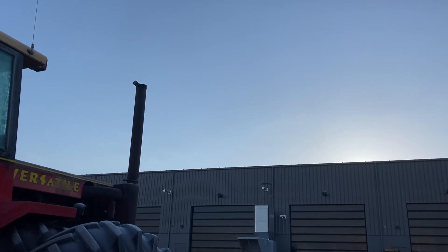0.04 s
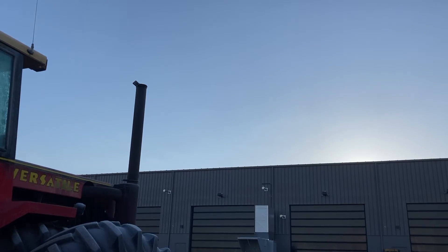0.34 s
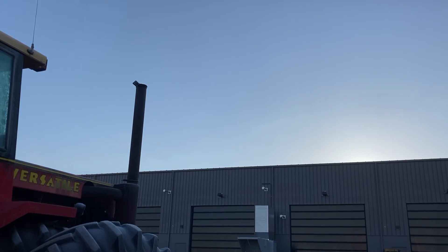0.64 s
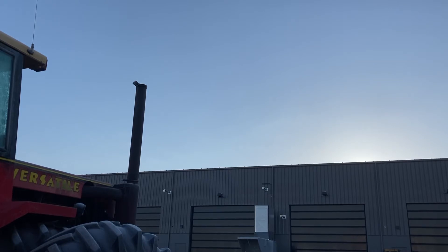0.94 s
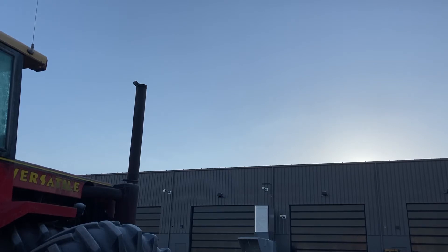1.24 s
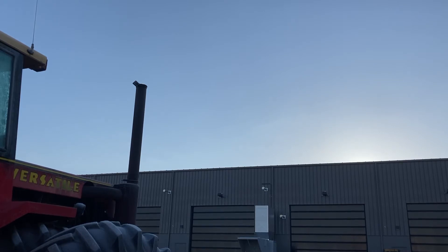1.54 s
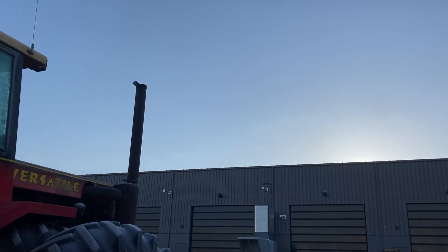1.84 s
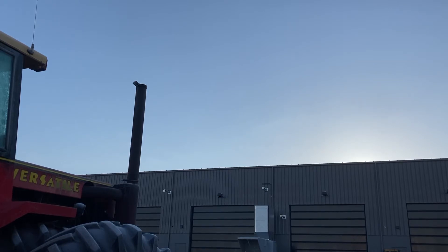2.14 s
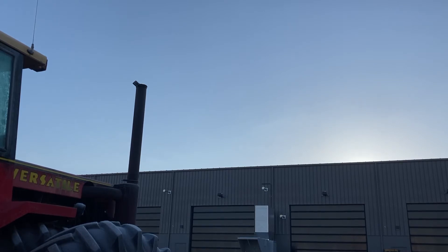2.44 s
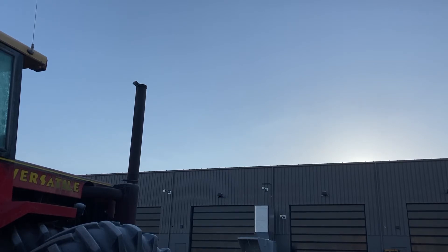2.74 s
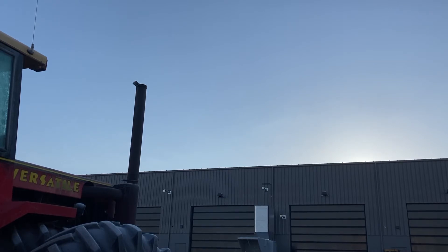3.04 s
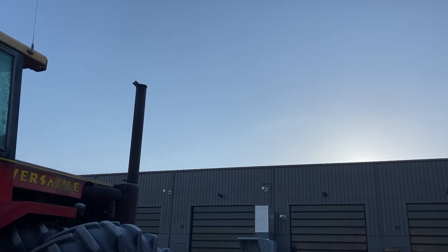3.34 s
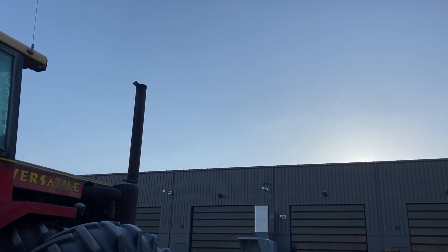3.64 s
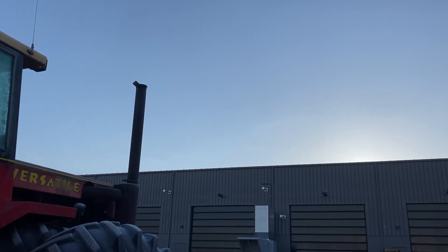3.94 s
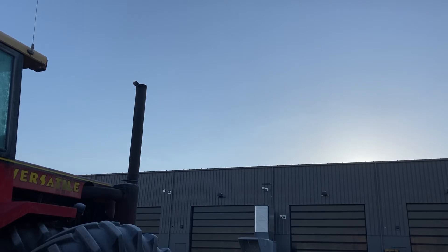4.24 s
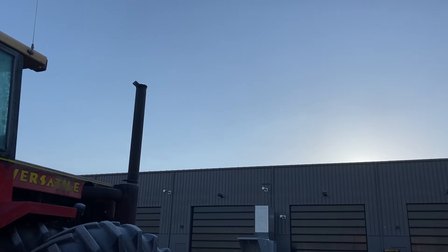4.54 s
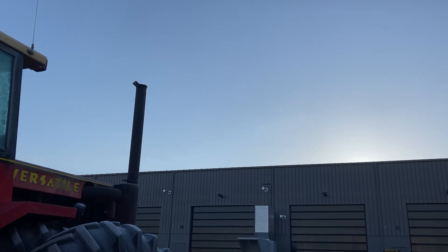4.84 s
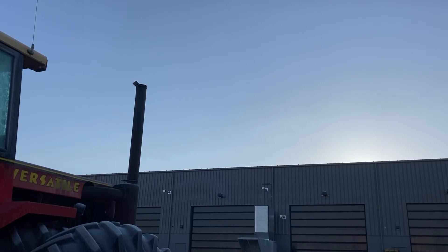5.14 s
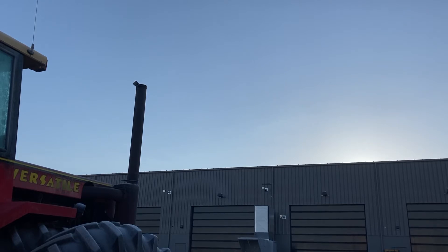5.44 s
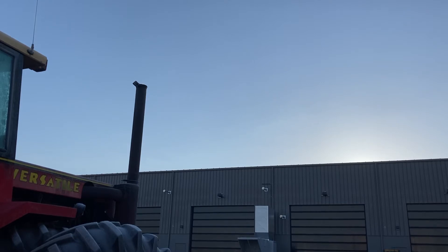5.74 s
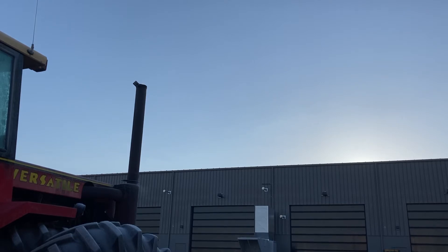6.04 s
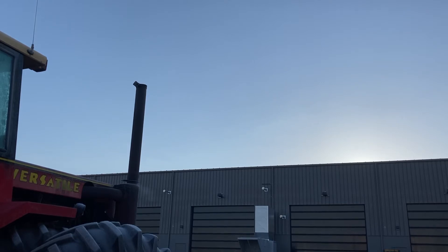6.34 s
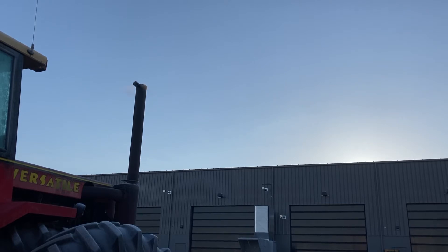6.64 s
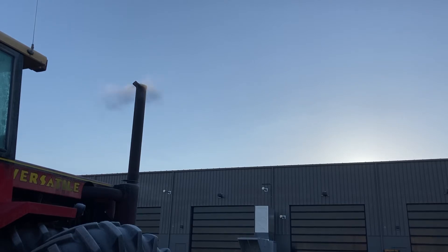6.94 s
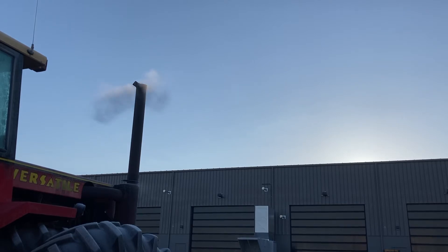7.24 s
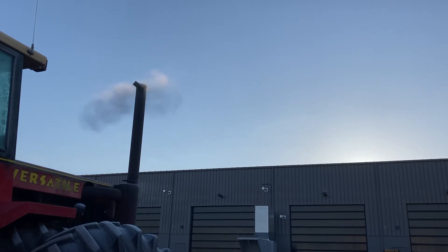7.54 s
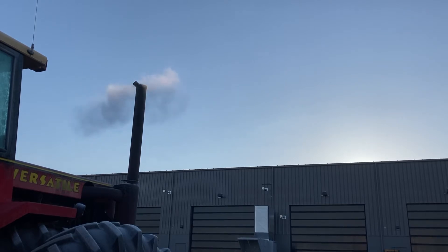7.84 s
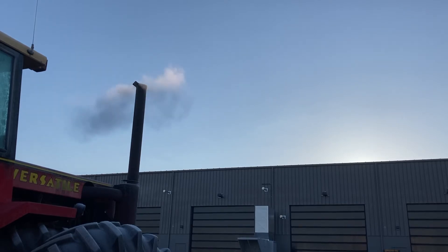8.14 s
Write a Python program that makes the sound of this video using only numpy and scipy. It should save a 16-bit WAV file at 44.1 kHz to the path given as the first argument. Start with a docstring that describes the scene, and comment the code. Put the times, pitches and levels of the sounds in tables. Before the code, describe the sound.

A diesel engine idles outdoors from the start and runs throughout, with even low knocking, light ticking and a hum carrying a gently wavering whine. A faint click comes at about 4.2 seconds. At about 5.6 seconds, a tractor close by gives a quick pair of sharp metal clacks, and its starter engages with one heavy thud at 5.7. Cranking follows, clearly louder than the idle. The starter's rough, low groan lurches at first, then rises a little in pitch and settles by about 6.5 seconds into nine or ten pulses a second. The cold engine thumps, clatters, rings and puffs air as it turns, with scattered metal clacks between 6 and 8 seconds. A nearby metal building throws back a short echo. The tractor is still cranking without catching when the sound ends at about 8.4 seconds.

```python
"""Tractor cranking in a yard

A diesel engine idles by a metal building, knocking, ticking and humming. Then a big tractor is cranked
close by. The starter pinion slams in and its gear groans up to speed, swelling at every compression,
while the cold engine thumps, clatters, puffs and now and then clacks. The wall throws the groan back."""
import sys
import numpy as np
from scipy import signal
from scipy.fft import rfft, irfft, next_fast_len
from scipy.io import wavfile
from scipy.ndimage import uniform_filter1d, map_coordinates

SR = 44100
rng = np.random.default_rng(int(sys.argv[2]) if len(sys.argv) > 2 else 0)


def file_out(sig):
    """Save sig as 16-bit WAV at sys.argv[1]."""
    # one column per channel
    cols = np.atleast_2d(sig).T
    # limit, then scale
    lim = np.clip(cols, -1, 1)
    pcm = np.round(lim * 32767).astype(np.int16)
    wavfile.write(sys.argv[1], SR, pcm)


N = 369999
T = np.arange(N) / SR
HZ = np.fft.rfftfreq(N, 1 / SR)

IDLE_REV_HZ = 11.667
START_S, LANDING_S = 5.68, 5.693  # starter takes load; pinion lands
IDLE_DELAY_S, CRANK_DELAY_S = 0.00046, 0.000258  # right channel behind left

# Stereo image of each engine: (frequency [Hz], coherence [0-1], extra left lead [rad], left-right [dB])
IDLE_IMAGE = [(60, 0.98, 0, -2.3), (140, 0.85, 0.1, -4.7), (290, 0.6, -0.3, -2), (560, 0.55, 2.2, -4.5),
              (720, 0.65, 0.6, 2), (1300, 0.65, -1.2, 0.5), (2700, 0.7, -0.9, 0), (3300, 0.4, 1.4, 2),
              (5000, 0.25, 1.8, -2.3), (7000, 0.3, -0.6, -2), (12000, 0.3, 0, 0)]
CRANK_IMAGE = [(60, .99, 0, -3.5), (220, .96, 0, -.7), (300, .9, .6, .9), (600, .25, .8, 2.4),
               (1050, .5, .35, 2.2), (1500, .55, .6, 2.2), (4500, .15, 0, 0), (10000, .7, 0, 0)]
# Starter speed, lurching, then steady: (time [s], tooth mesh rate [Hz])
MESH_RATE = [(5.68, 232), (5.785, 242), (5.835, 200), (5.9, 247), (5.955, 196), (6.0, 228), (6.07, 281),
             (6.1, 279), (6.135, 232), (6.165, 257), (6.19, 234), (6.225, 270), (6.29, 256), (6.45, 288),
             (8.39, 293.5)]
# Each cylinder in turn loads the starter: (time [s], groan [dB], low ring [dB], high ring [dB], boom [dB])
COMPRESSIONS = [(5.69, -23.5, -40, -46, -31), (5.905, -14.5, -32, -45, -26), (6.115, -15, -42, -43, -27.5),
                (6.262, -15.5, -34, -28.5, -26), (6.367, -20, -30, -33, -25),
                (6.487, -16.5, -23.5, -31, -29), (6.599, -17.5, -28, -31, -27),
                (6.703, -22, -25, -39, -32.5), (6.792, -22, -23, -26.5, -32.5), (6.897, -17, -28, -33, -25),
                (7.011, -18.5, -26, -30, -27), (7.117, -19, -28.5, -32, -32),
                (7.221, -20.5, -23, -26.5, -24.5), (7.32, -19, -24, -29, -28), (7.419, -20, -30, -25, -35),
                (7.53, -17.5, -26, -36, -21.5), (7.643, -16.5, -32.5, -36, -31),
                (7.751, -19.5, -29.5, -29.5, -33), (7.854, -16.5, -30, -29, -32),
                (7.961, -18, -34.5, -31, -29), (8.064, -18.5, -41, -37, -29),
                (8.171, -20.5, -38.5, -27, -23.5), (8.271, -18, -32, -30.5, -25.5),
                (8.375, -19, -31, -30, -25), (8.48, -17.5, -31, -30, -22)]


def amp(db):
    """Decibels to gain."""
    return 10 ** (np.asarray(db) / 20)


def unit(x):
    """Scale to rms 1."""
    return x / np.sqrt(np.mean(x ** 2) + 1e-20)


def curve(rows):
    """Time table's first value column at every sample."""
    rows = np.array(rows)
    return np.interp(T, rows[:, 0], rows[:, 1])


def across(rows, hz=HZ, column=1):
    """Frequency table column, interpolated on a log axis."""
    rows = np.array(rows)
    return np.interp(np.log(hz + 1), np.log(rows[:, 0] + 1), rows[:, column])


def bump(centre_s, half_s):
    """Gaussian envelope, peak 1."""
    return np.exp(-((T - centre_s) / half_s) ** 2)


def drift(hz):
    """Low-passed noise, rms 1."""
    size = next_fast_len(N)
    lowpass = 1 / (1 + (np.fft.rfftfreq(size, 1 / SR) / hz) ** 4)
    return unit(irfft(rfft(rng.standard_normal(size)) * lowpass, size)[:N])


def colour(x, spectrum, modes=(), ripple_db=0):
    """Filter by a broad spectrum, resonance humps and the ripple of many small panel modes."""
    humps_db = sum(db / (1 + (2 * (HZ - hz) / width) ** 2) for hz, width, db in modes)
    panels = unit(uniform_filter1d(uniform_filter1d(rng.standard_normal(len(HZ)), size=250), size=150))
    return irfft(rfft(x) * amp(across(spectrum) + humps_db + ripple_db * panels * HZ / (HZ + 1000)), N)


def stereo(pair, image=CRANK_IMAGE, delay_s=CRANK_DELAY_S):
    """Mix two independent signals into partly coherent left and right."""
    a, b = rfft(pair)
    coherence = np.clip(across(image), 0, 1)
    tilt = amp(across(image, column=3))
    lead_rad = 2 * np.pi * HZ * delay_s + across(image, column=2)
    right = (coherence * a + np.sqrt(1 - coherence ** 2) * b) * np.exp(-1j * lead_rad)
    return irfft(np.array([a * tilt, right]) * np.sqrt(2 / (1 + tilt ** 2)), N)


def point(x, image=CRANK_IMAGE, delay_s=CRANK_DELAY_S):
    """Point source: fully coherent, placed by phase and level."""
    return stereo(np.array([x, x]), [(hz, 1, lead, db) for hz, _, lead, db in image], delay_s)


def yard(x, wet_db, gap_s=0.02):
    """Add scattered wall and ground echoes, separate per channel."""
    # Echo decay: (frequency [Hz], t60 [s])
    decay = [(100, 1), (1000, 0.32), (8000, 0.24)]
    size = SR // 2
    taps = rng.standard_normal((2, size)) * (rng.random((2, size)) < .05) * (T[:size] > gap_s)
    hz, t, bins = signal.stft(taps, SR, nperseg=256)
    tail = signal.istft(bins * amp(-60 * t / across(decay, hz)[:, None]), SR, nperseg=256)[1]
    return x + amp(wet_db) * signal.fftconvolve(x, tail / np.linalg.norm(tail[0]), axes=1)[:, :N]


def rev_noise(revs):
    """Noise that partly repeats every revolution."""
    # Repeating part: (frequency [Hz], power share [0-1])
    repeating = [(70, .3), (300, .35), (600, .5), (1000, .6), (1400, .65), (2400, .6), (3800, .3),
                 (7000, .7)]
    size = round(SR / IDLE_REV_HZ)
    one_rev = unit(irfft(np.exp(2j * np.pi * rng.random((2, size // 2 + 1))), size))
    looped = np.array([map_coordinates(side, [revs % 1 * size], mode="grid-wrap") for side in one_rev])
    fresh = rng.standard_normal((2, N))
    share = np.clip(across(repeating), 0, 1)
    return irfft(rfft(looped) * np.sqrt(share) + rfft(fresh) * np.sqrt(1 - share), N)


def idle_knocks(revs, valve_db=0.35, firing_db=0.65):
    """Three firings per revolution, with valve beats between, shake the block."""
    # Knocking: (frequency [Hz], density [dB/Hz])
    spectrum = [(20, -111), (45, -61.5), (72, -59.5), (125, -64), (200, -67.5), (255, -64), (335, -71.5),
                (375, -67), (450, -72), (650, -66.5), (1000, -70), (1600, -71), (2400, -77), (4200, -81.5),
                (7000, -105), (11500, -104), (15000, -120)]
    # Block and cover resonances: (frequency [Hz], width [Hz], gain [dB])
    modes = [(75, 11, 0.5), (578, 46, 5), (1226, 170, 2), (2210, 290, 6), (3080, 75, 5), (3540, 400, 3.5),
             (5344, 710, 13.5), (6884, 1170, 20)]
    firing_rad = 2 * np.pi * 3 * revs
    beats = amp(valve_db * np.cos(2 * firing_rad) + firing_db * np.cos(firing_rad))
    return colour(unit(rev_noise(revs) * beats), spectrum, modes, ripple_db=3.5) * np.sqrt(SR / 2)


def idle_ticks(revs, decay_s=0.0096):
    """Injectors and valves ring the covers in the same pattern every turn."""
    # Ticks: (place in revolution [0-1], level [dB])
    pattern = [(0, 0), (.167, -9), (.333, -4), (.5, -5), (.667, -4), (.833, -10)]
    # Cover response: (frequency [Hz], density [dB/Hz])
    covers = [(900, -110), (1700, -88), (2100, -80.5), (2400, -81), (2850, -79.5), (3300, -93),
              (6000, -118), (12000, -140)]
    beats = sum(amp(db) * np.exp(-((revs - place) % 1) / IDLE_REV_HZ / decay_s) for place, db in pattern)
    return colour(unit(rev_noise(revs) * beats), covers) * np.sqrt(SR / 2)


def idle_hum(revs, waver_db=0.8, whine_db=1.3, trough_db=-12):
    """Tones at multiples of crank speed; the whine dips, the tones just above it surge."""
    # Engine orders: (crank multiple, left [dB], right [dB], left lead [rad])
    orders = [(5, -49.5, -48.0, -0.2), (6, -48.0, -45.0, -0.0), (8, -51.0, -46.5, 0.2),
              (12, -39.5, -34.5, 0.7), (13, -47.0, -47.0, 0.4), (15, -47, -40.5, 0.3), (18, -53, -57, 0.7),
              (23, -58.5, -49.0, 0.7), (36, -58.5, -51.0, 3.0), (42, -49.0, -50.0, 2.8),
              (46, -42.5, -40.5, 1.9), (48, -41.0, -33.0, -2.6), (50, -48.0, -54.5, 2.9),
              (54, -59.0, -50.5, 2.4), (56, -53, -54, 1.5), (57, -53, -53, 1.5), (59, -46.0, -51.0, 1.7),
              (60, -51.5, -48.5, 2.5), (63, -47.0, -48.0, -2.8), (64, -51.5, -52.5, -3.0),
              (68, -53, -55, 2), (69, -52.0, -55.0, -2.9), (71, -50.0, -56.5, -1.8), (72, -45, -56, 1.8),
              (81, -51.0, -54.0, 2.8), (84, -56, -57, 2), (93, -55.0, -48.0, -3.1),
              (94, -53.0, -52.0, -2.6), (95, -53.0, -53.5, -2.6), (102, -51.0, -48.5, 2.7),
              (105, -46.5, -58.0, 3.1), (107, -52, -53, 2.2), (108, -48.0, -48.5, 2.4),
              (110, -51.5, -56.0, 2.6), (116, -52.0, -50.5, 1.5), (118, -51.5, -51.5, 2.6),
              (120, -53, -53, 2.2), (192, -57.5, -53.0, -0.7), (198, -56, -56, 0.0), (216, -58, -58, 0.6),
              (219, -58, -58, 0.6), (240, -54.5, -53.0, 1.2)]
    # Dips of the whine near 550 Hz: (time [s], depth [dB])
    dips = [(.02, 1.5), (.52, 3), (1.25, 2.5), (1.6, 2), (1.97, 4.5), (2.4, 3), (2.9, 1), (3.35, 4),
            (3.97, 1), (4.25, 0), (4.6, -0.5), (4.95, 3), (5.58, 5.5)]
    # Surges at 650-700 Hz: (time [s], gain [dB], half length [s])
    surges = [(.36, 3, .17), (.9, 2, 0.18), (1.38, -2, .1), (1.78, -2, 0.1), (2.2, 1, .15),
              (2.638, 0, 0.12), (3.08, 2.5, 0.099), (3.58, -4, .14), (4.45, -4, .16), (5.0, -2, .13),
              (5.37, 3.5, 0.12)]
    whine = amp(whine_db - sum(db * bump(s, half_s=.08) for s, db in dips))
    surge = amp(trough_db) + sum(amp(db) * bump(s, half_s) for s, db, half_s in surges)
    out = np.zeros((2, N))
    for order, left_db, right_db, lead_rad in orders:
        angle = 2 * np.pi * (order * revs + rng.random())
        tone = np.array([amp(left_db) * np.cos(angle), amp(right_db) * np.cos(angle - lead_rad)])
        gain = whine if 46 <= order <= 48 else surge if 56 <= order <= 60 else 1
        out += gain * amp(waver_db * drift(hz=2.9)) * tone
    return np.sqrt(2) * out


def idle_swells(waver=0.0119):
    """Wavering tones rise out of the idle and sink back."""
    # Tones: (frequency [Hz], top level [dB], centre [s], half length [s])
    swells = [(56.7, -44.5, 1.8, 3.3), (73.6, -40, 1.1, 0.83), (77.3, -41.5, 2.75, 0.94),
              (81.2, -45.5, 4.45, 1.2), (296.5, -46.5, 1.48, 1.08), (371.6, -48, 1.3, 1.18)]
    out = np.zeros(N)
    for hz, db, s, half_s in swells:
        cycles = np.cumsum(hz * (1 + waver * drift(hz=9))) / SR
        out += amp(db) * bump(s, half_s) * np.cos(2 * np.pi * cycles)
    return point(np.sqrt(2) * out, IDLE_IMAGE, IDLE_DELAY_S)


def idle(wander=0.00047):
    """Idling diesel; slight speed wander blurs the high tones and leaves the low ones sharp."""
    revs = np.cumsum(IDLE_REV_HZ * (1 + wander * drift(hz=4.2))) / SR
    noise = stereo(idle_knocks(revs) + idle_ticks(revs), IDLE_IMAGE, IDLE_DELAY_S)
    return noise + idle_hum(revs) + idle_swells()


def engaged(rise_s=0.0052):
    """0 until the starter takes load, then 1."""
    return np.clip((T - START_S) / rise_s, 0, 1)


def strokes(lag_strokes):
    """Running count of compressions, less a lag."""
    return np.interp(T, [row[0] for row in COMPRESSIONS], np.arange(len(COMPRESSIONS))) - lag_strokes


def slack(lag_strokes=0.):
    """0 at each compression, 1 midway between two, shifted by the lag."""
    return .5 - .5 * np.cos(2 * np.pi * strokes(lag_strokes))


def stroke_db(column, lag_strokes=0.):
    """One level column of the compressions, held through each stroke."""
    nearest = np.clip(np.round(strokes(lag_strokes)), 0, len(COMPRESSIONS) - 1).astype(int)
    return uniform_filter1d(np.array(COMPRESSIONS)[nearest, column], size=600)


def exhaust(gain_db=-5, dip_db=18):
    """Each cylinder puffs air and smoke through the stack, harder under load."""
    # Puff: (frequency [Hz], level [dB])
    spectrum = [(30, -50), (90, -30), (160, -12), (240, 10), (340, -9), (450, 1), (700, -3), (900, -26),
                (2500, -32), (8000, -50)]
    air = unit(colour(rng.standard_normal((2, N)), spectrum))
    level_db = curve(COMPRESSIONS) + gain_db - dip_db * slack(lag_strokes=0.23)
    return stereo(air * amp(level_db) * engaged())


def clatter(build_db=15, run_up_s=0.15, bass_hz=140, treble_hz=4500, jolt_db=5, jolt_s=0.013):
    """Gears and valve gear rattle the block, building with speed; the landing pinion jolts it once."""
    # Rattle: (frequency [Hz], density [dB/Hz])
    spectrum = [(20, -62), (55, -48), (100, -53.5), (160, -55), (300, -53.5), (600, -53.5), (850, -58),
                (1150, -62), (1700, -63), (2700, -66.5), (4800, -76.5), (7000, -76.5), (11000, -84),
                (15500, -102)]
    # Engine resonances: (frequency [Hz], width [Hz], gain [dB])
    modes = [(90, 18, 3.5), (360, 30, -2), (1050, 150, 7), (1125, 50, 5.5), (1390, 70, 6), (1530, 50, 0.5),
             (1720, 60, 3), (1930, 150, 2), (2920, 220, 3), (6400, 730, 10)]
    blows = unit(rng.standard_normal((2, N)) * amp(1.5 * drift(hz=250)))
    rattle = colour(blows, spectrum, modes, ripple_db=3.0) * np.sqrt(SR / 2)
    treble = irfft(rfft(rattle) * HZ ** 4 / (HZ ** 4 + treble_hz ** 4), N)
    bass = irfft(rfft(rattle) / (1 + (HZ / bass_hz) ** 8), N)
    body = rattle - treble - bass
    sluggish = np.exp(-np.maximum(T - START_S, 0) / run_up_s)
    # After each compression the bass throbs, then the treble rises as the crank springs forward.
    throb = bass * (1 - sluggish) * amp(-4 - 8 * slack(lag_strokes=0.21))
    spring = treble * amp(-4 - 5 * slack(lag_strokes=0.38))
    turning = (body + throb + spring) * amp(-build_db * sluggish) * engaged()
    jolt = body * amp(jolt_db) * np.exp(-abs(T - LANDING_S) / jolt_s)
    return stereo(turning + jolt)


def clacks(gain_db=-1, t60_s=0.17, body_hz=4000):
    """Solenoid, pinion and loose metal strike with a short, dense ring."""
    # Strikes: (time [s], level [dB], body gain [dB])
    strikes = [(4.2482, -51, 0), (5.638, -37.5, 13.5), (5.67, -25.5, 6.5), (6.009, -32.5, -4),
               (6.4223, -36, -1), (6.4662, -35, 7), (6.893, -36.5, 10), (7.309, -32.5, 9), (7.634, -34, 10),
               (8.0521, -37, -1)]
    # Metal ring: (frequency [Hz], level [dB])
    spectrum = [(200, -8), (1000, -31), (3500, 9.5), (7000, 9), (11000, 9), (15500, -11)]
    ring = unit(colour(rng.standard_normal((2, N)), spectrum))
    body = irfft(rfft(ring) / (1 + (HZ / body_hz) ** 4), N)
    out = np.zeros((2, N))
    for s, db, body_db in strikes:
        span = slice(round(s * SR), min(N, round(s * SR) + SR // 2))
        envelope = amp(db + gain_db - 60 * (T[span] - s) / t60_s)
        out[:, span] += (ring[:, span] + body[:, span] * (amp(body_db) - 1)) * envelope
    return stereo(out)


def booms(detune=0.0238, uneven_db=1.6, load_share=0.58):
    """Each compression rocks the block and stack, which boom harder under load."""
    # Block and stack modes: (frequency [Hz], level [dB], time to peak [s])
    modes = [(86, -29, .022), (228, -26.5, .014), (424, -26.5, .019), (505, -31, .022), (630, -30, .028)]
    t, out = T[:SR // 5], np.zeros(N + SR)
    mean_db = np.mean([row[-1] for row in COMPRESSIONS])
    for s, *_, boom_db in COMPRESSIONS:
        for hz, db, peak_s in modes:
            pitch, force = rng.standard_normal(2)
            tone = np.sin(2 * np.pi * (hz * (1 + detune * pitch) * t + rng.random()))
            envelope = t / peak_s * np.exp(1 - t / peak_s)
            gain = amp(db + load_share * (boom_db - mean_db) + uneven_db * force)
            out[round(s * SR):][:len(t)] += tone * envelope * gain
    return yard(point(out[:N]), wet_db=-13.5)


def housing_rings(gain_db=-1, dip_db=13, smear_cycles=.1):
    """As the crank springs forward, the gearing sings in one housing resonance after another."""
    # Housing resonances: (frequency [Hz], place in stroke [0-1], gain [dB])
    low_rings = [(721, .42, -1), (875, .88, -9)]
    high_rings = [(1006, .63, -3.5), (1042, .53, -1), (1163, .86, -6)]
    out = np.zeros(N)
    for column, rings in ((2, low_rings), (3, high_rings)):
        for hz, place, db in rings:
            tone = np.sqrt(2) * np.cos(2 * np.pi * (hz * T + smear_cycles * drift(hz=22) + rng.random()))
            out += tone * amp(stroke_db(column, place) + db + gain_db - dip_db * slack(place))
    return yard(point(out * engaged()), wet_db=-11)


def pinion_slam(rise_s=0.0035):
    """The pinion lands on the ring gear with one heavy thud."""
    # Gear housing modes: (frequency [Hz], level [dB], t60 [s])
    modes = [(105, -21, 0.12), (234, -1, 0.062), (293, -28, 0.3), (412, -19, 0.12), (596, -32, 0.047),
             (710, -25, 0.15)]
    t = np.maximum(T - LANDING_S, 0)
    ring = sum(amp(db - 60 * t / t60_s) * np.sin(2 * np.pi * hz * t) for hz, db, t60_s in modes)
    return yard(point(ring * (1 - np.exp(-t / rise_s))), wet_db=-11.5)


def tooth_knocks(teeth, lurch, gain_db=-20, lurch_db=9, uneven_db=4, backlash_teeth=.1):
    """Each tooth lands early or late with its own force, hardest while the starter lurches."""
    # Response of the shaken metal: (frequency [Hz], level [dB])
    spectrum = [(100, -25), (190, -11), (350, -9), (420, 4), (540, -3), (720, -4), (820, -9), (1000, -5),
                (1400, -18), (4000, -37), (12000, -49)]
    landed = np.maximum.accumulate(np.floor(teeth + backlash_teeth * drift(hz=150)))
    impacts = (np.diff(landed, prepend=0) > 0) * amp(uneven_db * rng.standard_normal(N))
    return unit(colour(impacts, spectrum)) * amp(gain_db + lurch_db * lurch)


def mesh_teeth(sag=0.018, jitter=0.0074):
    """Running count of teeth; each compression slows the starter a little."""
    load = 1 - 2 * slack(lag_strokes=0.15)
    return np.cumsum(curve(MESH_RATE) * (1 - sag * load + jitter * drift(hz=49.9))) / SR


def starter(rough_db=3.5, labour_hz=260, dip_db=14.5, drag_db=4, lurch_loss_db=3.2):
    """The loaded gear groans at each compression, beating with a weaker tone just above it."""
    teeth = mesh_teeth()
    angle = 2 * np.pi * teeth
    # While slow, the gear is harsher and stays loaded for more of each stroke.
    mesh_hz, full_hz = curve(MESH_RATE), MESH_RATE[-1][1]
    labour = np.maximum(labour_hz / mesh_hz, 1) ** 4
    lurch = np.clip((1 - mesh_hz / full_hz) / .1, 0, 1)  # full chatter at 10 % below speed
    overtones = amp(-18) * np.cos(2 * angle) + amp(-25) * np.cos(3 * angle)
    side_tone = amp(-14) * np.cos(1.12 * angle + drift(hz=15.6))
    flutter = unit(amp(rough_db * (1 + .8 * lurch) * np.tanh(drift(hz=57.0))))
    groan = np.sqrt(2) * (np.cos(angle) + side_tone + labour * overtones) * flutter
    gear = groan + tooth_knocks(teeth, lurch)
    unloaded = np.clip(slack() / 0.9, 0, 1) ** (2 * labour)
    drop_db = (dip_db - drag_db * lurch) * unloaded + lurch_loss_db * lurch
    return yard(point(gear * amp(stroke_db(column=1) - drop_db) * engaged()), wet_db=-16)


def scene():
    """Idling engine throughout, cranked tractor over it."""
    return (idle() + pinion_slam() + starter() + housing_rings()
            + booms() + exhaust() + clatter() + clacks())


def record(dry):
    """Low-pass at 15.9 kHz."""
    lowpass = signal.firwin(511, 15900, window=("kaiser", 9), fs=SR)
    return signal.oaconvolve(dry, lowpass[None], "same")


dry = scene()
out = record(dry)
file_out(out)
```